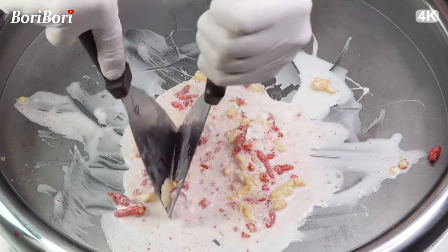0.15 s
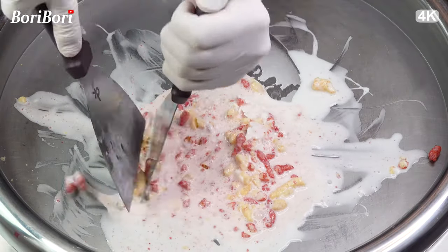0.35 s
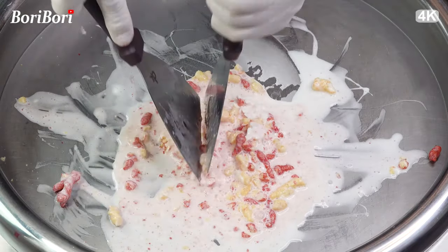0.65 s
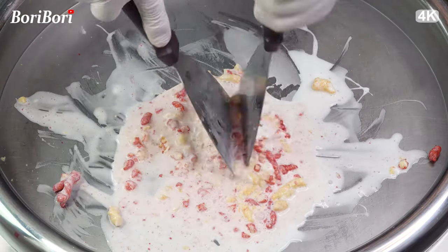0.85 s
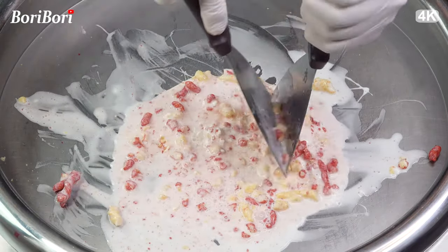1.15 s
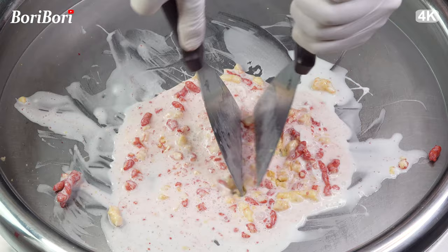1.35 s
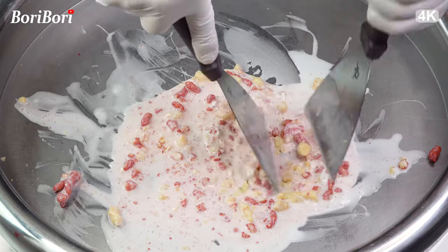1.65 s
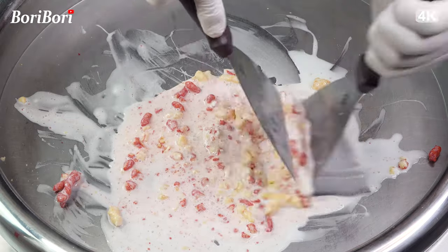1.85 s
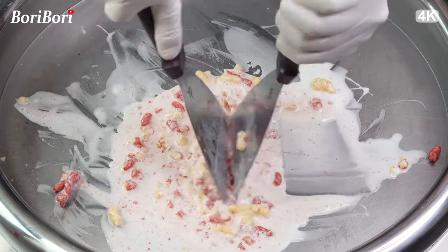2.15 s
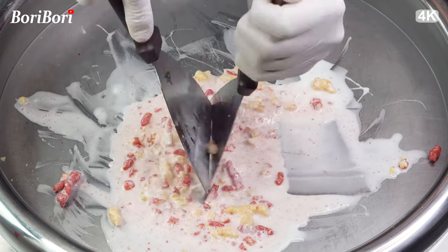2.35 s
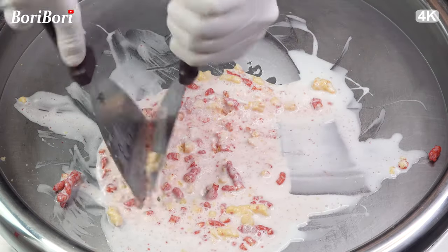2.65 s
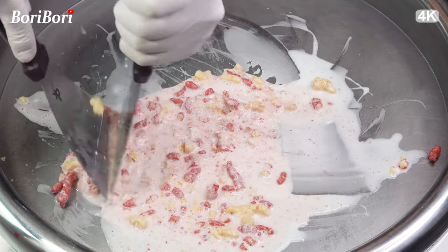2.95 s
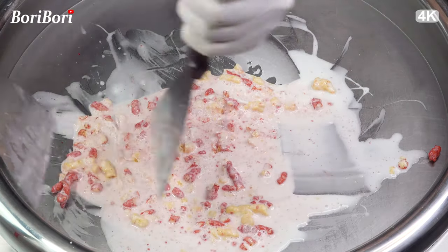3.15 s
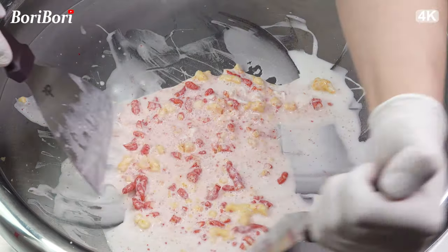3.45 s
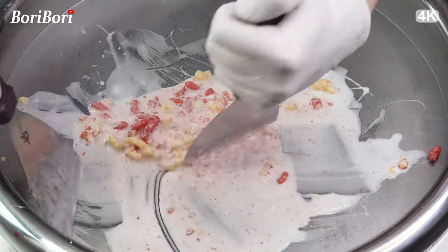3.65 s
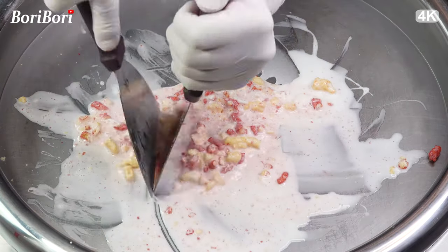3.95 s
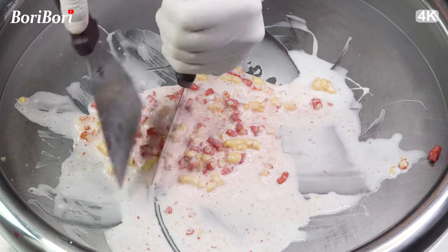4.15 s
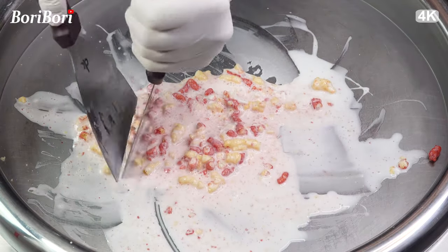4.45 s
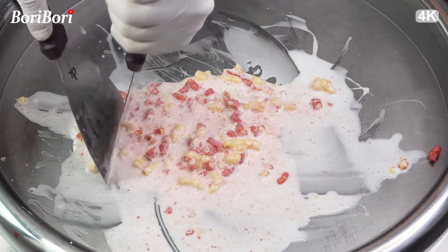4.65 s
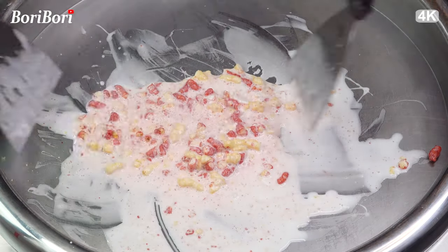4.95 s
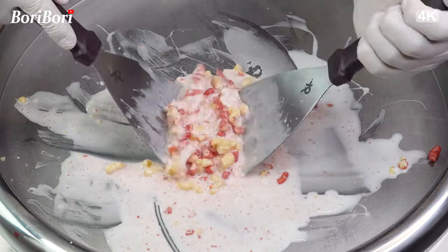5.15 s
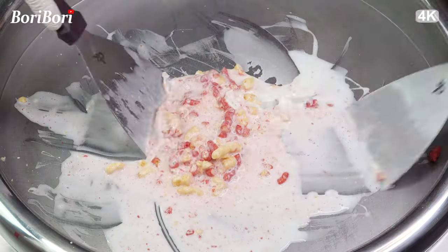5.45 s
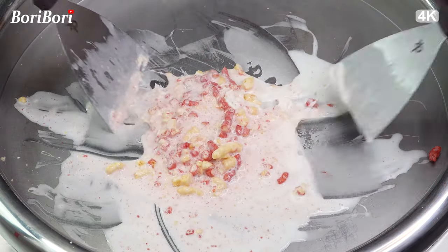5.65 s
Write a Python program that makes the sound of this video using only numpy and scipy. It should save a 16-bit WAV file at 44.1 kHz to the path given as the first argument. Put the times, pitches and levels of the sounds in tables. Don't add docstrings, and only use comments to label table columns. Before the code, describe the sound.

Two steel spatulas chop in fast, bright, clacking flurries on a metal pan, with short scrapes between and a faint low hum.

```python
import sys
import numpy as np
from scipy import signal
from scipy.fft import rfft, irfft, next_fast_len
from scipy.io import wavfile
from scipy.ndimage import uniform_filter1d, map_coordinates

SR = 44100
rng = np.random.default_rng(int(sys.argv[2]) if len(sys.argv) > 2 else 0)


def digitize_waveform(pressure):
    field = np.atleast_2d(pressure).T
    bounded = np.clip(field, -1, 1)
    quanta = np.round(bounded * 32767).astype(np.int16)
    wavfile.write(sys.argv[1], SR, quanta)


def boost(x):
    u = np.asarray(x, float) / 20
    return 10 ** u


N = 256206
SPAN = 16384
HZ = np.fft.rfftfreq(SPAN, 1 / SR)
T = np.arange(SPAN) / SR

# start_s, crack_db, ring_db, boom_db
FIRM_CHOPS = [(0.004, -16.5, -23.5, -34), (0.0881, -15.5, -25.5, -33), (0.1293, -17.5, -24.5, -34),
              (0.2038, -13.5, -23, -34), (0.259, -13.5, -22, -28.5), (0.3585, -14.5, -31.5, -37),
              (0.4017, -17, -33, -33.5), (0.4767, -12, -22.5, -35), (0.5379, -16, -26.5, -35.5),
              (0.6082, -17.5, -31.5, -36.5), (0.669, -35, -30, -25), (0.7418, -15, -29, -33.5),
              (1.208, -21, -30, -27.5), (1.2943, -15.5, -32.5, -29.5), (1.3411, -23, -39.5, -35.5),
              (1.4223, -28, -38.5, -42), (1.5715, -27, -49, -40.5), (1.703, -41, -39, -54),
              (1.7104, -13.5, -28, -29), (1.8675, -11.5, -26, -42.5),
              (2.0912, -15.5, -24.5, -34.5), (2.1035, -10, -25.5, -41), (2.169, -14.5, -28.5, -32),
                (2.3476, -17.5, -47, -29.5), (2.4005, -11.5, -29, -27.5), (2.4768, -15.5, -25, -30.5),
                (2.533, -14, -26.5, -28.5), (2.604, -14, -25.5, -32), (2.625, -15.5, -30, -37.5),
                (2.6672, -23, -24, -26.5), (2.7353, -14, -26, -35.5), (2.8061, -12.5, -20, -30.5),
                (2.8749, -13.5, -27, -36), (2.8973, -16, -26.5, -37), (2.9384, -12, -21.5, -35),
                (2.9509, -15.5, -23.5, -34), (3.0252, -11, -56, -40), (3.0607, -14.5, -24.5, -36),
                (3.2286, -13.5, -26.5, -36), (3.719, -26.5, -38, -46),
              (3.9185, -16.5, -40, -40), (3.9547, -19, -31.5, -44), (3.9888, -12, -20, -30),
               (4.0153, -44.5, -31.5, -38), (4.1081, -15, -27.5, -32.5), (4.1759, -14, -24.5, -30.5),
               (4.2581, -15.5, -34, -38.5), (4.3345, -15, -23.5, -31), (4.393, -13, -23, -33),
               (4.4765, -14, -21, -30.5), (4.5521, -13, -23.5, -36), (4.619, -15, -21.5, -37),
               (4.6816, -14, -23.5, -44.5), (4.6915, -23.5, -48.5, -36.5), (4.7537, -10.5, -23.5, -36.5),
               (5.0862, -17.5, -28.5, -45.5)]
# start_s, crack_db, ring_db, brightness_db
CORNER_TAPS = [(0.076, -33, -31, -12), (0.3512, -26, -57, -5), (0.3879, -39, -26, -6),
               (1.1992, -45, -36.5, -6), (1.2851, -30.5, -28.5, -5), (1.559, -41, -35.5, -7),
               (2.0769, -38, -34, -10), (2.3326, -29, -24.5, -11.5), (2.468, -27, -32, -15),
               (2.5986, -22, -33, -10), (2.729, -25, -61, -3), (2.867, -25.5, -29, -23),
               (3.2095, -37, -28.5, -2), (3.3377, -16, -30.5, 1), (3.893, -62.5, -43, -23),
               (3.904, -36, -32, -2.5), (4.094, -39, -31.5, -3), (4.2445, -40, -26, -16),
               (4.32, -50.5, -27, 1.5), (4.4616, -37, -28.5, 0), (4.7485, -21, -34, -6),
               (4.834, -44, -34.5, -1), (5.4351, -18.5, -25.5, -2)]
# start_s, crack_db, ring_db, brightness_db
LIGHT_TOUCHES = [(0.825, -56, -45.5, -3), (0.875, -40.5, -64, 4), (0.93, -44, -42, -1),
                 (0.965, -30.5, -45.5, 2), (0.9983, -43, -47, -16), (1.0706, -32, -40, -1),
                 (1.1499, -30.5, -36.5, -10), (1.53, -29, -39, -1.5), (1.633, -52, -47.5, -3),
                 (1.9404, -25.5, -37, -9.5), (1.971, -39.5, -45.5, -6), (2.222, -34, -59, 7),
                 (2.245, -34, -49, 3), (2.2565, -33, -53, -18), (2.2849, -16.5, -32.5, -5.5),
                 (2.426, -26, -29.5, -8), (2.502, -23, -34, -5), (3.0077, -13.5, -21.5, -7.5),
                 (3.3485, -24.5, -27.5, -5), (3.669, -23, -27.5, -6.5), (4.584, -27.5, -45, 2),
                 (4.852, -19, -35, -12.5), (5.0325, -19, -27, -5.5), (5.131, -29, -47, 5),
                 (5.4428, -19.5, -39, -7.5), (5.467, -24, -28, -12.5), (5.686, -47.5, -61, -1),
                 (5.8063, -24, -18.5, 1)]
# pitch_hz, width_hz, level_db
UPRIGHT_BLADE = [(1420, 160, -9), (1986, 40, 3), (2353, 40, -2), (2638, 25, 3), (3058, 30, 0),
                 (3280, 40, 3), (3500, 60, -1), (3983, 90, -2), (4916, 50, -1), (5400, 60, -4),
                 (7500, 200, -14), (8233, 40, -9), (9900, 250, -13), (10700, 120, -12), (13500, 100, -12)]
# pitch_hz, width_hz, level_db
FLAT_BLADE = [(1160, 240, -14), (1850, 320, -2), (2552, 70, 2), (3300, 150, 0), (4314, 160, 2),
              (4803, 110, 1), (5380, 90, 2), (6400, 120, -8), (7290, 120, -6), (7620, 90, -5),
              (8190, 120, -8), (9800, 150, -9), (10700, 150, -9), (12500, 150, -12), (13000, 120, -10),
              (14100, 120, -12)]
# pitch_hz, level_db (per Hz)
RING_COLOUR = [(300, -5), (800, -11.5), (1400, -4), (1620, -7), (2200, 0.5), (2850, -10), (3300, 2),
               (4500, 1), (6000, -1), (7000, -8), (12000, -13), (15700, -14.5), (16200, -31), (17000, -102)]
# pitch_hz, level_db (per Hz)
CRACK_COLOUR = [(300, -2.5), (1000, -14.5), (2000, -0.5), (4300, 7), (6500, -3), (13000, -1), (15800, -2.5),
                (16700, -93.5), (17200, -72.5)]
# pitch_hz, level_db, fade_s (to -60 dB)
PAN_BOOM = [(88, -31, 0.2), (126.4, -23.5, 0.54), (162.2, -19, 0.39), (266.6, -17, 0.3), (290.4, -4, 0.16),
            (313, 6.5, 0.16), (335, -7, 0.1), (370, -11, 0.25), (417, -20, .2)]
# pitch_hz, level_db, fade_s (to -60 dB)
PAN_OVERTONES = [(514, -5.5, 0.31), (551.6, -2.5, 0.2), (564.6, -1, 0.13), (585, 4.5, 0.19),
                 (646.4, -12, 0.33), (686, -17.5, 0.33), (1025, -13, 0.2), (1367, -22, 0.055),
                 (1410, -3.5, 0.21)]
# time_s, level_db
PAN_PLACE = [(0, 2), (0.7, -7), (1.2, -10.5), (1.75, -5.5), (1.87, 6), (2.1, -10.5), (2.7, -2.5), (3.1, 1),
             (3.7, -22), (4.0, 1.5), (4.3, 0.5), (4.75, 4.5), (5.1, -29)]
# time_s, climb (share of pitch)
BLADE_LIFT = [(0, 0.044), (.8, 0.028), (1.7, 0.069), (2.4, .03), (3.1, 0.057), (4.0, 0.069), (4.35, 0.15),
              (4.8, 0.13)]
# peak_s (the push ends, ring-out begins), half_length_s (of the push before it), level_db,
# brightness_db
SLIDES = [(0.821, 0.022, -39.5, -10), (0.937, 0.02, -45, -24), (1.084, 0.0093, -33.5, -6.5),
          (1.459, 0.011, -46, 7), (1.894, .025, -27.5, -13.5), (2.232, 0.021, -39, -18),
          (2.277, 0.0058, -30, -7), (3.051, 0.016, -25.5, -7), (3.083, 0.031, -26.5, -11),
          (3.444, 0.061, -52.5, -25), (3.488, 0.031, -45.5, 0), (3.692, 0.03, -43.5, -24),
          (4.023, 0.02, -33, -22), (4.786, 0.021, -26, -15.5), (5.049, 0.019, -36.5, -27.5),
          (5.184, 0.022, -40.5, -3), (5.532, 0.024, -33.5, -1.5), (5.597, 0.029, -54, -0.5),
          (5.783, 0.037, -58, -3)]
# start_s, pitch_hz, level_db, life_s
BLADE_TONES = [(1.0, 2000, -46.5, 0.069), (1.712, 3300, -34, 0.14), (3.469, 10300, -44, .08),
               (3.465, 13000, -46, .09), (3.46, 13600, -46.5, .1), (3.465, 13990, -51, .09),
               (3.672, 2490, -25.5, 0.1), (3.672, 3100, -33, .06), (3.3, 9832, -33, 0.065),
               (3.672, 8100, -34.5, 0.064), (3.3, 8200, -40, 0.16), (5.436, 2000, -35, 0.094),
               (5.486, 7300, -39, 0.048), (5.089, 7600, -42, 0.11), (0.0044, 2600, -34, 0.077),
               (0.47, 3200, -34, 0.18), (0.52, 4200, -59, .13), (1.074, 4300, -33, 0.065),
               (1.71, 5040, -36.5, 0.15), (1.866, 2490, -38, 0.27), (1.87, 685, -35, 0.17),
               (1.712, 580, -45, .15), (3.99, 575, -24, 0.15), (4.477, 520, -35, 0.14),
               (4.176, 590, -33, .1), (5.437, 950, -44, 0.13), (4.7, 1300, -38.5, .1),
               (2.401, 3430, -23, 0.082), (2.429, 7600, -41, 0.14), (2.624, 1930, -39, 0.3),
               (2.628, 3390, -41, 0.08), (3.16, 8190, -35.5, 0.13), (3.24, 3930, -24, 0.071),
               (3.21, 7400, -34, 0.095), (3.673, 4800, -34, .16), (3.718, 5500, -31.5, 0.071),
               (3.718, 4400, -57, 0.39), (4.032, 1560, -38, 0.22), (4.176, 1475, -34.5, 0.13),
               (4.36, 8900, -35.5, 0.14), (3.69, 1210, -39, 0.1), (4.78, 2000, -32.5, 0.2),
               (5.032, 4200, -21, 0.052), (5.034, 5380, -33, 0.08), (5.434, 5460, -28, 0.11),
               (5.525, 3900, -31.5, 0.091)]
# start_s, length_s, first_hz, last_hz, final_db
SQUEALS = [
    (3.406, 0.09, 4380, 4270, -37.5),
    (3.407, 0.083, 1340, 1310, -54),
]
# start_s, level_db, centre_hz, length_s
GRIT_TICKS = [(0.811, -41, 3500, .004), (0.824, -35, 4200, .004), (1.459, -42, 5000, .004),
              (1.846, -51, 4000, 0.0087), (1.973, -34, 3300, 0.0047), (2.0, -41, 3500, .005),
              (3.585, -60, 4500, .006), (3.684, -27, 3200, 0.0063), (5.039, -21, 4240, 0.0052),
              (5.174, -34, 4000, .003), (5.187, -35, 4500, 0.0035), (5.197, -35, 5000, .003),
              (5.468, -28.5, 1250, 0.0051), (5.522, -26, 4000, .004), (5.531, -23, 3800, 0.0053),
              (5.588, -47, 2100, .004), (5.598, -46, 4200, .004), (5.636, -54.5, 4100, .01),
              (0.671, -30.5, 1900, 0.014), (0.676, -34, 900, 0.023), (4.333, -21, 6000, .003),
              (5.03, -27.5, 4800, 0.0036), (5.444, -26, 5610, 0.0052), (1.091, -44.5, 280, 0.035),
              (1.082, -34, 4400, .008), (2.627, -24, 3300, .005), (3.065, -21.5, 4000, .004),
              (1.715, -27, 4000, 0.0012), (5.44, -24, 5400, .003)]
# multiple (of the shaft rate), level_db (rms)
HUM_ORDERS = [(2, -64.5), (3, -60.5), (4, -53.5), (6, -62), (8, -64), (10, -96.5), (12, -88)]
# time_s, level_db
MACHINE_LEVEL = [(0, 8), (1, 1), (2, 3), (3, 1.5), (4, 2.5), (4.8, 2.5), (5.1, 0), (5.81, 0.5)]
# pitch_hz, level_db (per Hz)
ROOM_COLOUR = [(15, -37), (28, -10), (52, -36), (85, -15), (165, -11), (186, -26), (240, -16), (500, -18),
               (1300, -26), (4000, -42), (4600, -42), (5000, -33), (5500, -46), (8000, -54), (11500, -58),
               (13000, -75)]


def unit(x):
    return x / np.sqrt(np.mean(x ** 2) + 1e-20)


def along(points, hz):
    f, v = np.transpose(points)
    return np.interp(np.log(hz + 1), np.log(f + 1), v)


def at_time(points, s):
    return np.interp(s, *np.transpose(points))


def wobble(rate):
    knots = rng.standard_normal(int(N * rate / SR) + 4)
    return map_coordinates(knots, [np.arange(N) * rate / SR])


def flicker(size, shape=SPAN, passes=1):
    x = rng.standard_normal(shape)
    for _ in range(passes):
        x = uniform_filter1d(x, size=size)
    return unit(x)


def add(track, s, sound):
    track[max(round(s * SR), 0):][:len(sound)] += sound


def contacts():
    rows = []
    for s, crack_db, ring_db, bright_db in CORNER_TAPS + LIGHT_TOUCHES:
        rows.append((s, crack_db, ring_db, bright_db, ring_db - 19, ring_db - 26.5, False))
    for s, crack_db, ring_db, boom_db in FIRM_CHOPS:
        crisp_db = 0.54 * (crack_db - ring_db - 13.5)
        dull_db = 0.58 * max(boom_db - ring_db + 5.5, 0)
        bright_db = min(-6.5 + crisp_db - dull_db, 5)
        over_db = boom_db + at_time(PAN_PLACE, s) + 0.26 * (ring_db + 26)
        rows.append((s, crack_db, ring_db, bright_db, boom_db, over_db, True))
    return rows


def crack_burst(crack_db, bright_db, upright):
    sharp_db = 0.24 * (bright_db + 13.0) * np.log2(HZ / 5000 + 0.061)
    burst = unit(irfft(rfft(rng.standard_normal(SPAN)) * boost(along(CRACK_COLOUR, HZ) + sharp_db)))
    chatter = boost(1.65 * flicker(24))
    softness_db = np.clip(-17 - crack_db, 0, 25)
    lasts_s = 0.0026 * boost(0.63 * softness_db) * (1 if upright else 1.54)
    crack = burst * chatter * (1 - np.exp(-T / 0.00065)) * np.exp(-(T / lasts_s) ** 2)
    return crack / np.std(crack[:SR // 300])


def blade_noise(modes, peak_db, scatter_db, detune, bright_db):
    c, width, db = np.transpose(modes)[:, :, None]
    draw = rng.standard_normal((2, len(modes), 1))
    c = c * (1 + detune * (1 + (c / 5000) ** 2) * draw[0])
    height = boost(db - along(RING_COLOUR, c) + peak_db + scatter_db * draw[1])
    peaks = height ** 2 / (1 + (2 * (HZ - c) / width) ** 2)
    tilt_db = 0.33 * (bright_db + 8.5) * np.log2(np.clip(HZ, 700, 7000) / 4000)
    colour = boost(along(RING_COLOUR, HZ) + tilt_db) * np.sqrt(1 + peaks.sum(0))
    z = rfft(rng.standard_normal(SPAN)) * colour
    high = 1 / (1 + (7000 / (HZ + 1)) ** 10)
    return unit(irfft(z * (1 - high))), unit(irfft(z * high))


def blade_ring(ring_db, bright_db, upright):
    low, high = blade_noise(UPRIGHT_BLADE if upright else FLAT_BLADE,
                            peak_db=8.0 + 0.1 * min(ring_db + 32, 0), scatter_db=3.5,
                            detune=0.004 if upright else 0.006, bright_db=bright_db)
    ring = low * boost(-60 * T / 0.19) + high * boost(bright_db - 60 * T / 0.2)
    skid = boost(1.12 * flicker(70) * np.exp(-T / 0.011))
    rise_s = 0.0024 if upright else 0.003
    return ring * skid * (1 - np.exp(-T / rise_s))


def pan(modes, rise_s, lift=0, stagger=1):
    c, db, fade_s = np.transpose(modes)[:, :, None]
    draw = rng.standard_normal((3, len(modes), 1))
    t = T[:SPAN // 2]
    drag = flicker(250, passes=2)[:SPAN // 2]
    bend = 1 + 0.0092 * draw[1] - 0.02955 * (c / 500) ** 1.52 * np.exp(-t / 0.0187)
    bend = bend + lift * np.minimum(1, (700 / c) ** 2) * (1 - np.exp(-(t / 0.0506) ** 2))
    start = stagger * np.pi * np.arange(len(modes))[:, None] + 0.75 * draw[2]
    phase = 2 * np.pi * c * np.cumsum(bend, axis=1) / SR + start + 0.29 * drag
    ring = boost(db + 2.65 * draw[0] - 60 * t / fade_s) * np.sin(phase)
    swell = ring.sum(0) * (1 - np.exp(-t / rise_s)) ** 2 * (1 - (t / t[-1]) ** 4)
    return swell / np.std(swell[:SR // 30])


def chops():
    out = np.zeros(N + SPAN)
    for s, crack_db, ring_db, bright_db, boom_db, over_db, upright in contacts():
        crack = crack_burst(crack_db, bright_db, upright)
        ring = blade_ring(ring_db, bright_db, upright)
        heavy = boom_db > ring_db + 2
        boom = pan(PAN_BOOM, rise_s=0.0027, stagger=0.6 if heavy else 1)
        overtone = pan(PAN_OVERTONES, rise_s=0.0044, stagger=0.702, lift=at_time(BLADE_LIFT, s))
        add(out, s, boost(crack_db - 4.0) * crack + boost(ring_db + 1.5) * ring)
        add(out, s, boost(boom_db - 1.5) * boom + boost(over_db - 3.0) * overtone)
    return out[:N]


def tones():
    out = np.zeros(N + SPAN)
    for s, hz, db, life_s in BLADE_TONES:
        flutter = unit(uniform_filter1d(rng.standard_normal((2, SPAN)), size=300))
        fade_db = 60 * (T / life_s) ** 1.56
        shape = (1 - np.exp(-T / 0.0012)) * boost(db + 3.0 + 1.6 * flutter[0] - fade_db)
        add(out, s, shape * np.sin(2 * np.pi * hz * T + 0.8 * flutter[1]))
    return out[:N]


def slides():
    out = np.zeros(N + SPAN)
    for s, half, db, bright_db in SLIDES:
        low, high = blade_noise(FLAT_BLADE, peak_db=3.0, scatter_db=2.5, detune=0.0072, bright_db=bright_db)
        push = np.exp(-2 * (T / half - 2) ** 2)
        ring_out = boost(-60 * (T - 2 * half) / (0.087 + 3 * half))
        stroke = np.where(T < 2 * half, push, ring_out)
        grit = boost(1.18 * flicker(60))
        add(out, s - 2 * half, boost(db) * stroke * grit * (low + boost(bright_db) * high))
    return out[:N]


def squeals():
    out = np.zeros(N + SPAN)
    for s, length, first_hz, last_hz, db in SQUEALS:
        done = np.clip(T / length, 0, 1)
        flutter = flicker(120, (2, SPAN), passes=2)
        swell_db = -14 * (1 - done)
        stop_db = -610 * np.maximum(T - length, 0)
        shape = np.minimum(5 * done, 1) * boost(db + 4.9 * flutter[0] + swell_db + stop_db)
        phase = 2 * np.pi * np.cumsum(first_hz + (last_hz - first_hz) * done) / SR
        add(out, s, shape * np.sin(phase + 0.95 * flutter[1]))
    return out[:N]


def ticks():
    out = np.zeros(N + SPAN)
    t, hz = T[:2048], HZ[::8]
    for s, db, centre_hz, length in GRIT_TICKS:
        octaves = np.abs(np.log2((hz + 1) / centre_hz))
        band = boost(-6.0 * (octaves / 0.39) ** 1.3)
        burst = unit(irfft(rfft(rng.standard_normal(len(t))) * band))
        add(out, s, boost(db) * burst * (1 - np.exp(-t / 0.00065)) * np.exp(-(t / length) ** 2))
    return out[:N]


def compressor(shaft_hz=35.73):
    phase = 2 * np.pi * np.cumsum(shaft_hz * (1 + 0.00061 * wobble(1.74))) / SR
    hum = np.zeros(N)
    for multiple, db in HUM_ORDERS:
        level = boost(db + 1.5 + 1.4 * wobble(9))
        hum += level * np.sin(multiple * phase + rng.uniform(0, 6))
    m = next_fast_len(N)
    colour = boost(along(ROOM_COLOUR, np.fft.rfftfreq(m, 1 / SR)))
    noise = unit(irfft(rfft(rng.standard_normal(m)) * colour, m)[:N])
    return boost(at_time(MACHINE_LEVEL, np.arange(N) / SR)) * (hum + boost(-57.0) * noise)


def scene():
    steel = chops() + tones() + slides() + squeals() + ticks()
    no_bass = signal.butter(3, 70, "high", fs=SR, output="sos")
    return (signal.sosfilt(no_bass, steel) + compressor())[None]


def low_pass(x):
    return signal.sosfilt(signal.butter(12, 16990, fs=SR, output="sos"), x)


def record(dry):
    m = next_fast_len(N)
    limited = dry / (1 + np.abs(dry / 0.55) ** 4) ** (1 / 4)
    edge = 1 / (1 + (np.fft.rfftfreq(m, 1 / SR) / 16700) ** 120)
    mix = irfft(rfft(limited, m) * edge, m)[:, :N]
    return low_pass(mix)


dry = scene()
out = record(dry)
digitize_waveform(out)
```